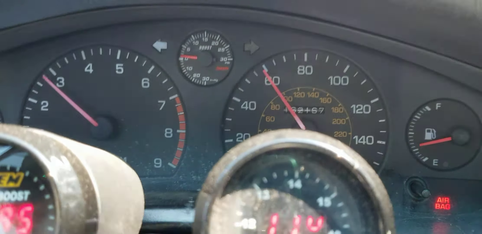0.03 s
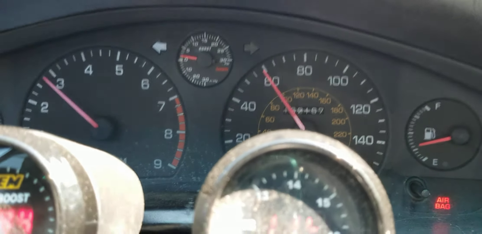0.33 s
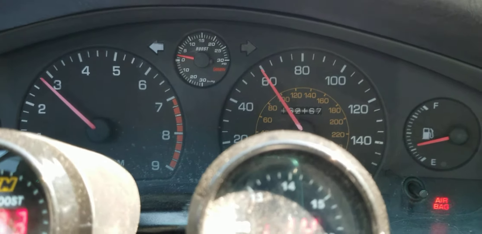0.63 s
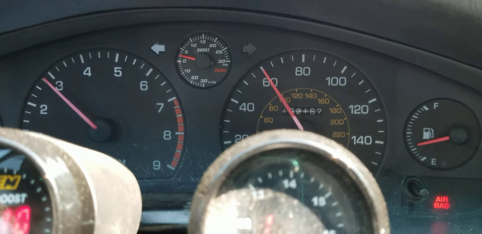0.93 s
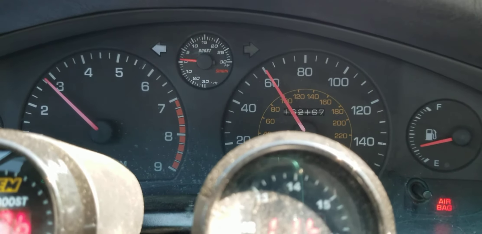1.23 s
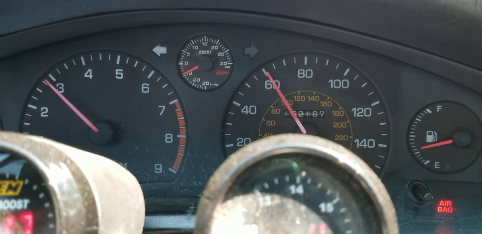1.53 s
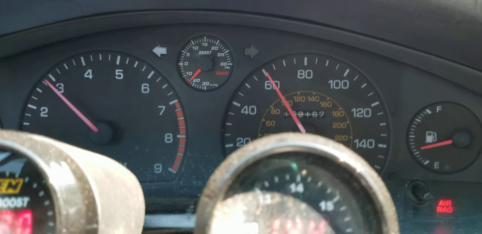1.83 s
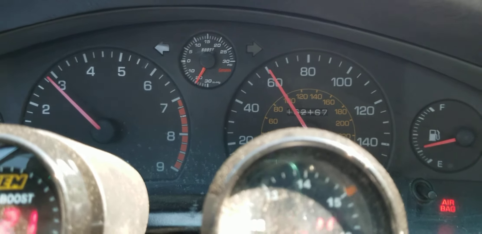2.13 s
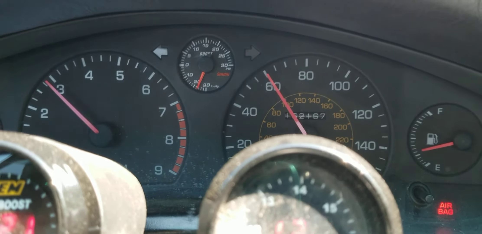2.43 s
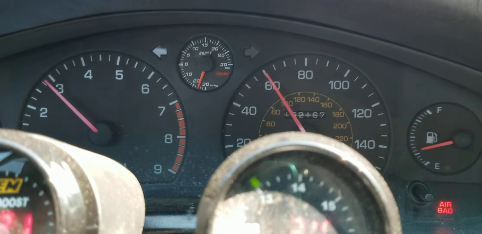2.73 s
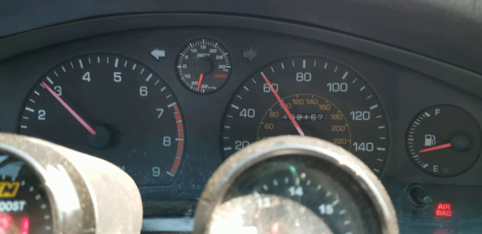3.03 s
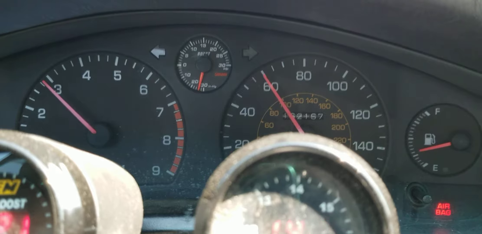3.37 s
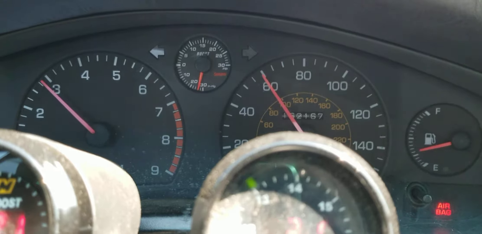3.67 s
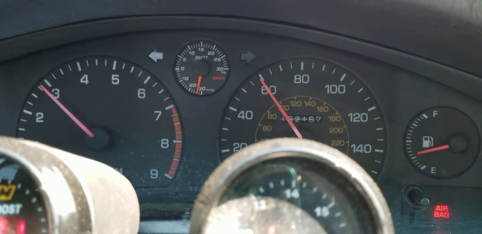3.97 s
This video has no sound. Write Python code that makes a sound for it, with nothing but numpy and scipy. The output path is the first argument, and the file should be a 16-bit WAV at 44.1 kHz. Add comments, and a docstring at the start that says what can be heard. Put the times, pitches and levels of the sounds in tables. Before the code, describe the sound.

Car engine drone and road rumble from inside, with a burst of turbo flutter.

```python
"""Inside a turbocharged car cruising at about 2900 rpm. The engine drones over road rumble and a faint
drivetrain whine, while the air intake hisses and the turbo whistles as it builds boost (air pressure).
The throttle lifts, the drone sinks and the turbo surges: air puffs back in chuffs that quicken and fade,
hooting in the intake pipe. Then the road grows rougher, the drone returns in uneven swells and the
trim ticks once."""
import sys
import numpy as np
from scipy import signal
from scipy.fft import rfft, irfft
from scipy.io import wavfile

SR = 44100
rng = np.random.default_rng(int(sys.argv[2]) if len(sys.argv) > 2 else 0)


def persist_wave(psi):
    """Save psi, clipped to +-1, as 16-bit WAV."""
    counts = np.round(np.clip(psi, -1, 1) * 32767).astype(np.int16)
    wavfile.write(sys.argv[1], SR, np.atleast_2d(counts).T)


N = 176400
T = np.arange(N) / SR
HZ = np.maximum(np.arange(N // 2 + 1) * SR / N, 1)


def from_db(db):
    """Turn decibels into a gain."""
    return 10 ** (np.asarray(db) / 20)


def unit_level(x):
    """Scale to an average (rms) level of 1."""
    return x / np.sqrt(np.mean(x ** 2) + 1e-20)


def over_time(rows):
    """Fill in a table's columns at every moment."""
    times, *columns = np.transpose(rows)
    return [np.interp(T, times, column) for column in columns]


def over_pitch(rows):
    """Fill in a table's columns at every frequency."""
    hz, *columns = np.transpose(rows)
    return [np.interp(np.log(HZ), np.log(hz), column) for column in columns]


def drift(rate_hz):
    """A random wobble of size about 1, mostly slower than rate_hz."""
    return unit_level(irfft(rfft(rng.standard_normal(N)) / (1 + (HZ / rate_hz) ** 2), N))


def phase_of(hz):
    """The angle a tone has turned through as its pitch moves."""
    return 2 * np.pi * np.cumsum(hz) / SR


def pan(left_db):
    """Gains that make the left side left_db louder than the right."""
    gains = from_db(np.array([[.5], [-.5]]) * left_db)
    return gains / np.sqrt(np.mean(gains ** 2, axis=0))


def cabin_reflections(depth_db=1.7, spacing_hz=70, onset_hz=900):
    """Echoes in the cabin lift some frequencies and weaken others, differently on each side."""
    points_hz = np.arange(0, SR / 2 + spacing_hz, spacing_hz)
    bumps = np.array([np.interp(HZ, points_hz, row) for row in rng.standard_normal((2, len(points_hz)))])
    return from_db(depth_db * bumps * HZ / (HZ + onset_hz))


def noise(colour, stereo, resonances=()):
    """Stereo noise. Its colour sets the balance of low and high; resonances ring on top."""
    power = unit_level(from_db(over_pitch(colour)[0])) ** 2
    for hz, width_hz, db in resonances:
        peak = unit_level(1 / (1 + ((HZ - hz) / (0.65 * width_hz)) ** 2))
        power = power + (from_db(db) * peak) ** 2
    likeness, left_db = over_pitch(stereo)   # likeness 1: both sides share the same noise
    shared, opposed = rfft(rng.standard_normal((2, N)))
    sides = np.sqrt((1 + likeness) / 2) * shared + np.sqrt((1 - likeness) / 2) * opposed * [[1], [-1]]
    return irfft(sides * pan(left_db) * np.sqrt(power) * cabin_reflections(), N)


# The engine's drone: time_s, firing_rate_hz, level_db
ENGINE_DRONE = [(0, 98, -14.5), (.1, 96.6, -16.5), (.28, 96.5, -17.5), (.4, 96.7, -15.5), (.75, 95.8, -15),
                (1.09, 98, -16), (1.25, 97.9, -19), (1.43, 97.47, -27), (2.0, 96.5, -26.5),
                (2.6, 96.22, -26.5), (2.9, 95.47, -23), (3.02, 94.8, -17), (3.16, 95, -27),
                (3.27, 94.5, -15.5), (3.36, 94.7, -27.5), (3.46, 95.07, -20), (3.56, 94.3, -16.5),
                (3.62, 93.9, -25), (3.69, 93.8, -21.5), (4, 93.3, -19)]
# Weaker tones around it: times_firing_rate, level_db
ENGINE_TONES = [(.5, -37), (1.5, -41), (2, -37), (3, -54.5), (4, -52)]


def engine():
    """The cylinders fire so fast that they boom as one note, louder when the engine works harder."""
    firing_hz, drone_db = over_time(ENGINE_DRONE)
    phase = phase_of(firing_hz)
    drone = from_db(drone_db + 1.47 * drift(4.9)) * np.sin(phase)
    for multiple, level_db in ENGINE_TONES:
        gain = from_db(level_db + 1.9 * drift(2.2))
        drone = drone + gain * np.sin(multiple * phase + .6 * drift(5))
    return np.sqrt(2) * drone * pan(left_db=-3)


# How loud the road is: time_s, thud_db, rumble_db, rush_db
ROAD_LEVELS = [(0, -32, -25, -38), (.6, -32, -30, -39.5), (1.1, -32.5, -27, -38), (1.35, -36, -26, -37),
               (1.75, -32, -27, -38.5), (2.15, -26.5, -28.5, -38.5), (2.55, -26, -26.5, -38),
               (2.8, -30.5, -26, -39), (2.95, -27.5, -26, -38.5), (3.35, -24.5, -27, -38),
               (3.65, -24.5, -21, -36.5), (4, -27, -25.5, -37)]
# The colours of those three noises: pitch_hz, relative_db
THUD_COLOUR = [(15, -41.5), (26, -25.5), (33, -9), (39, 2), (48, -5.5), (58, 5), (72, -11), (90, -15),
               (130, -38), (400, -83.5)]
RUMBLE_COLOUR = [(25, -29.5), (50, -16.5), (72, 4.5), (90, 3.5), (120, -2), (165, -0.5), (200, -5.5),
                 (240, -10.5), (290, -15), (340, -21.5), (500, -52.5), (2000, -100)]
RUSH_COLOUR = [(150, -9.5), (300, 2), (460, -0.5), (640, -1), (730, -4), (900, -7), (1050, -8), (1300, -10),
               (1550, -14), (2000, -11), (2650, -15.5), (3200, -26), (3900, -30), (5000, -28), (6200, -31),
               (7200, -44), (8300, -64), (11000, -52), (13500, -55), (16000, -49)]
# Where the cabin and tyres ring: pitch_hz, width_hz, relative_db
CABIN_RESONANCES = [(410, 52, -8.5), (865, 80, -10), (1959, 90, -16), (2360, 60, -24.5)]
# How road noise spreads between the ears: pitch_hz, likeness, left_db
ROAD_SPREAD = [(40, .995, -2.6), (100, .99, -2.9), (190, .98, -2), (330, .85, -.7), (580, .8, -2.3),
               (900, .5, -.5), (1300, .05, 1.5), (1900, -.15, 2.5), (3200, .1, 3), (5000, .1, 5.5),
               (11000, .3, -1)]


def road():
    """The suspension thuds, the car's body rumbles, and tyres and wind rush."""
    thud_db, rumble_db, rush_db = over_time(ROAD_LEVELS)
    thud = from_db(thud_db) * noise(THUD_COLOUR, ROAD_SPREAD)
    rumble = from_db(rumble_db) * noise(RUMBLE_COLOUR, ROAD_SPREAD)
    rush = from_db(rush_db + .4 * drift(21)) * noise(RUSH_COLOUR, ROAD_SPREAD, CABIN_RESONANCES)
    return thud + rumble + rush


# The drivetrain's note: time_s, pitch_hz, level_db
DRIVETRAIN_NOTE = [(0, 419, -52.5), (.4, 414.4, -42.5), (1.1, 411.7, -44), (1.7, 409.4, -50),
                   (2.1, 408.4, -45), (2.35, 422.3, -46), (2.9, 419, -43.5), (3.7, 423.5, -38),
                   (4, 417.3, -46.5)]


def drivetrain_whine(width_hz=10):
    """The parts that turn the wheels sing one thin, unsteady note."""
    pitch_hz, level_db = over_time(DRIVETRAIN_NOTE)
    phase = phase_of(pitch_hz)
    tone = drift(width_hz) * np.sin(phase) + drift(width_hz) * np.cos(phase)
    return from_db(level_db) * tone * pan(left_db=-1.5)


# How loud the intake hisses: time_s, level_db
HISS_LEVEL = [(0, -49), (.5, -49.5), (1.05, -47.5), (1.4, -52.5), (1.7, -57), (2, -63), (2.5, -62),
              (2.8, -67), (4, -62)]
# Its colour: pitch_hz, relative_db
HISS_COLOUR = [(1000, 9), (2600, 5.5), (3700, 4.5), (4400, 0.5), (6300, -2), (7300, -9), (8200, -15.5),
               (10500, -12), (12500, -17), (16000, -26.5)]
# Its spread between the ears: pitch_hz, likeness, left_db
HISS_SPREAD = [(800, 0.3, -10), (1990, 0.07, 6), (5000, 0, 2), (8000, 0.4, 30), (12000, 0.8, 1)]


def intake_hiss():
    """Air drawn into the engine hisses, louder with more boost."""
    level_db, = over_time(HISS_LEVEL)
    return from_db(level_db) * noise(HISS_COLOUR, HISS_SPREAD)


# The turbo's note: time_s, pitch_hz, level_db
TURBO_NOTE = [(0, 7000, -92), (.33, 7150, -78), (.40, 7200, -67), (.5, 7230, -66), (.6, 7280, -79),
              (1.03, 7550, -78), (1.12, 7500, -95)]


def turbo_whistle(waver_hz=44.8):
    """The turbo whistles faintly, rising in pitch as it spins up."""
    pitch_hz, level_db = over_time(TURBO_NOTE)
    tone = np.sqrt(2) * np.sin(phase_of(pitch_hz + waver_hz * drift(110)))
    return from_db(level_db) * tone * pan(left_db=14)


# The main chuffs: peak_s, air_db, hoot_db
MAIN_CHUFFS = [(1.127, -39.5, -30), (1.19, -37.5, -42), (1.261, -38, -33.5), (1.33, -39.5, -37.5),
               (1.396, -40, -33), (1.458, -41.5, -37.5), (1.515, -43, -39.5), (1.576, -44.5, -45),
               (1.635, -43.5, -46), (1.693, -44.5, -46), (1.751, -47, -54), (1.807, -45, -42.5),
               (1.862, -48.5, -44), (1.919, -49, -45)]
# Colours of the air burst and of its high spit: pitch_hz, relative_db
BURST_COLOUR = [(250, 14.5), (600, 7.5), (1100, 16), (1700, 5.5), (2500, 2), (3200, 0.5), (4400, -4.5),
                (6300, -3), (7300, -14.5), (8300, -15), (10500, -13.5), (13000, -18.5), (16000, -26.5)]
SPIT_COLOUR = [(3000, -39.5), (8000, -15), (11000, -2), (13300, 0), (14500, -6.5), (16000, -8.5)]
# Their spread between the ears: pitch_hz, likeness, left_db
CHUFF_SPREAD = [(800, 0.4, -3), (2000, 0.14, 0.5), (5000, .1, 9), (8000, 0, 13), (12000, 0, 2)]
# Where the intake pipe rings: pitch_hz, width_hz, relative_db
PIPE_RESONANCES = [(1263.7, 35, -9), (1550.4, 72, -16), (2240, 50, -18), (2550, 28, -14.5),
                   (3490, 54, -26.5), (6305, 180, -20.5)]


def turbo_surge(rise_s=.018, fall_s=.021, hoot_s=.0098, hoot_hz=800, climb_hz=78, drain_s=.35):
    """Each chuff blows air back through the pipe with a short hoot, higher as the boost drains."""
    air_gain, hoot_gain = 0, 0
    for peak_s, air_db, hoot_db in MAIN_CHUFFS + dying_chuffs(*MAIN_CHUFFS[-1]):
        age = T - peak_s
        air_gain = air_gain + from_db(air_db) * swell(age, np.where(age < 0, rise_s, fall_s))
        hoot_gain = hoot_gain + from_db(hoot_db) * swell(age, hoot_s)
    start_s = MAIN_CHUFFS[0][0]
    drained = 1 - np.exp(-np.maximum(T - start_s, 0) / drain_s)
    pitch_hz = hoot_hz + climb_hz * drained + 16 * drift(69.6)
    hoot = hoot_gain * np.sqrt(2) * np.sin(phase_of(pitch_hz)) * pan(left_db=-5.5)
    spit_gain = from_db(-55.5) * (air_gain / air_gain.max()) ** 1.6   # the strongest chuffs spit most
    spit = spit_gain * noise(SPIT_COLOUR, CHUFF_SPREAD)
    bursts = air_gain * noise(BURST_COLOUR, CHUFF_SPREAD, PIPE_RESONANCES)
    return bursts + spit + hoot


def swell(age, width_s):
    """A bell-shaped rise and fall, loudest at age 0."""
    return np.exp(-np.minimum((age / width_s) ** 2, 20))


def dying_chuffs(last_s, air_db, hoot_db, count=14, gap_s=.0565, shrink_s=.00044, loss_db=.6):
    """After the last main chuff, each one comes a little sooner and softer."""
    return [(last_s + gap_s * k - shrink_s * k * k / 2, air_db - loss_db * k, hoot_db - loss_db * k)
            for k in range(1, count + 1)]


# The colour of the trim's tick: pitch_hz, relative_db
TRIM_COLOUR = [(1000, -1), (3000, 0), (6500, -6.5), (8500, -22), (16000, -26.5)]


def trim_tick(start_s=3.677, level_db=-45.5, decay_s=.0061):
    """A piece of cabin trim ticks once on the rougher road."""
    fade = (T > start_s) * np.exp(-np.abs(T - start_s) / decay_s)
    return from_db(level_db) * fade * noise(TRIM_COLOUR, HISS_SPREAD)


def scene(bass_lag_s=.00012, lag_below_hz=1800):
    """Add up all the sounds; the cabin's boom reaches the left side slightly late."""
    left, right = engine() + road() + drivetrain_whine()
    lag_s = bass_lag_s / (1 + (HZ / lag_below_hz) ** 2)
    left = irfft(rfft(left) * np.exp(-2j * np.pi * HZ * lag_s), N)
    return np.array([left, right]) + intake_hiss() + turbo_whistle() + turbo_surge() + trim_tick()


def record(dry, cutoff_hz=15750, fade_s=.006):
    """Cut the highest treble steeply and fade both ends."""
    from_edge_s = np.minimum(T, T[-1] - T)
    fade = np.sin(np.pi / 2 * np.clip(from_edge_s / fade_s, 0, 1)) ** 2
    treble_cut = signal.ellip(10, .1, 80, cutoff_hz, fs=SR, output="sos")
    return fade * signal.sosfilt(treble_cut, dry)


dry = scene()
out = record(dry)
persist_wave(out)
```